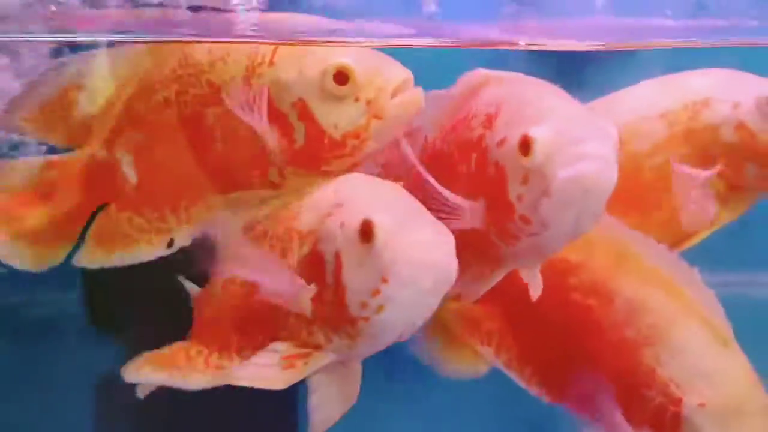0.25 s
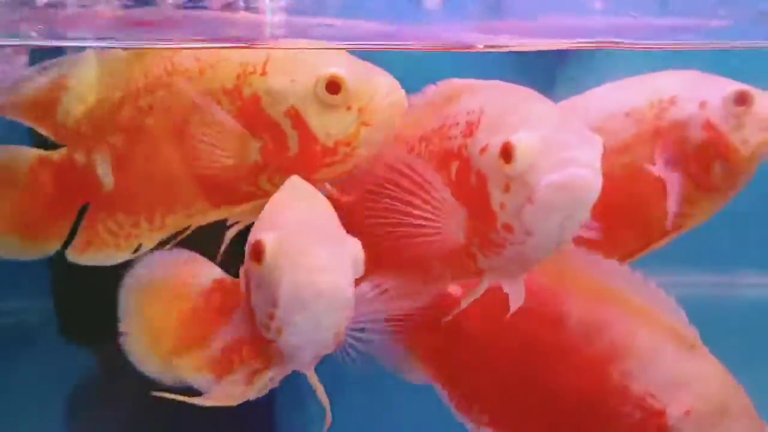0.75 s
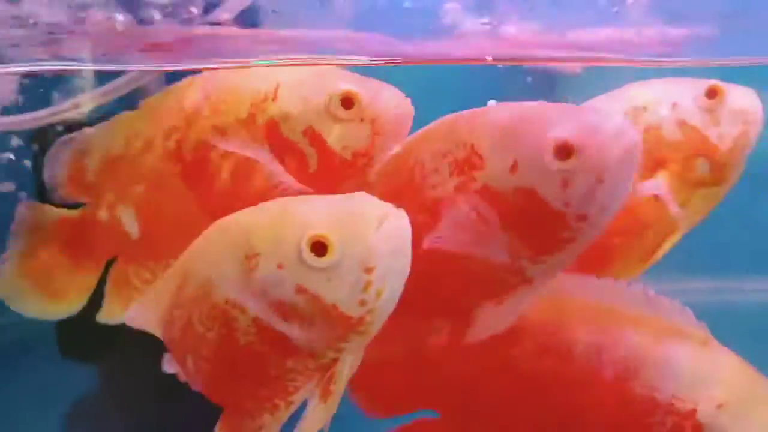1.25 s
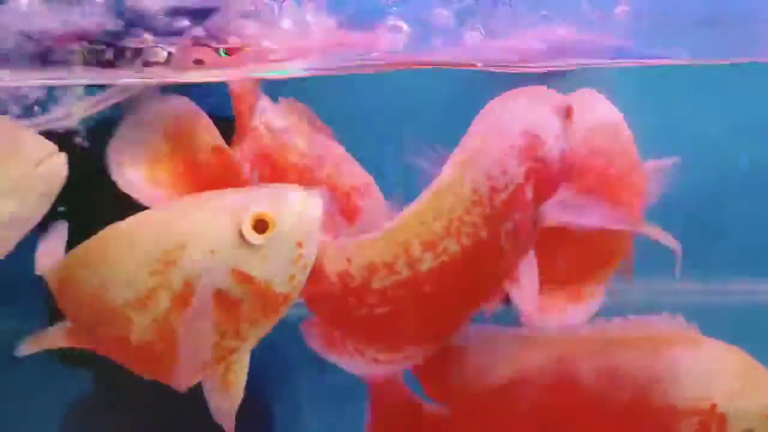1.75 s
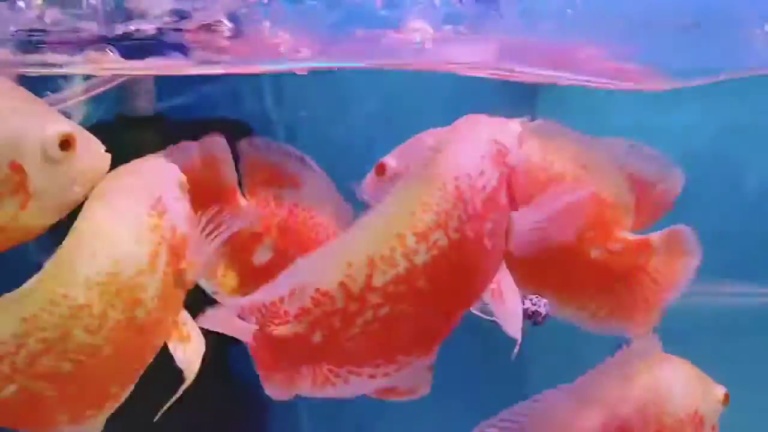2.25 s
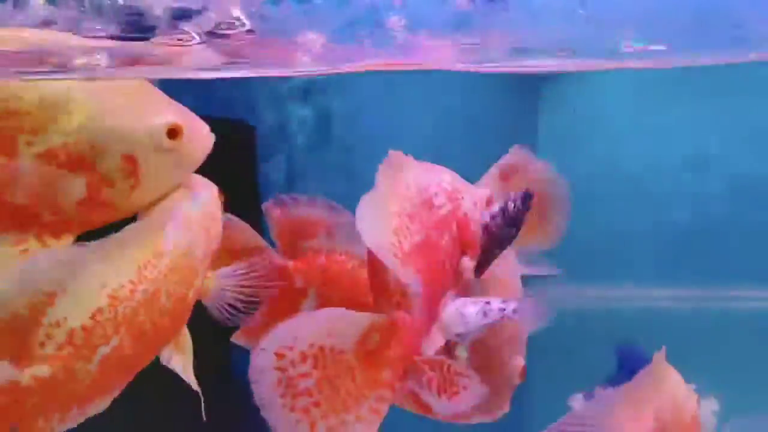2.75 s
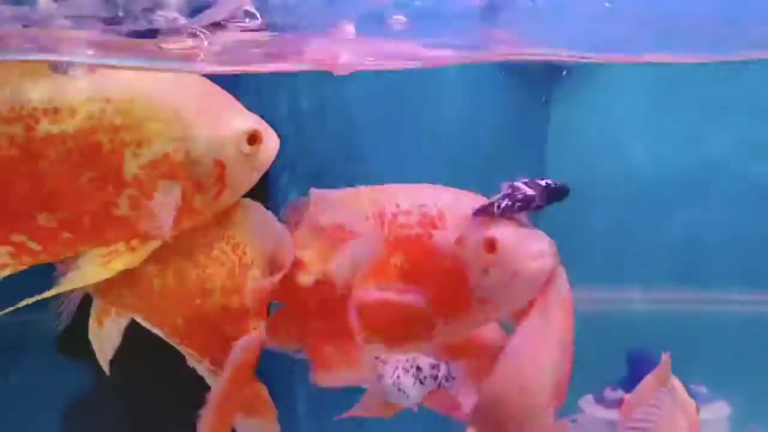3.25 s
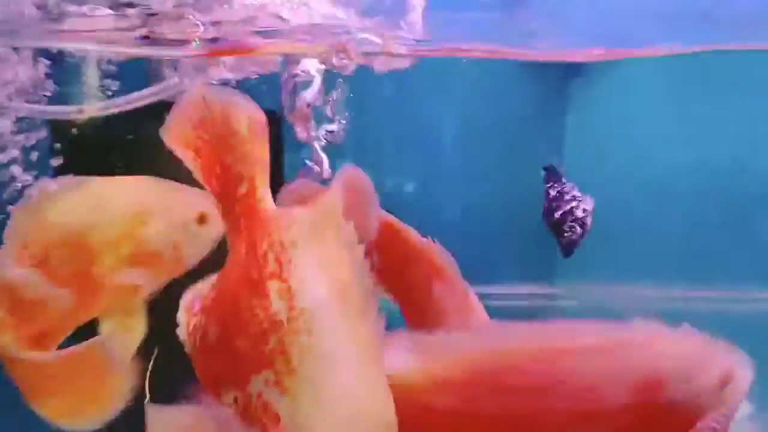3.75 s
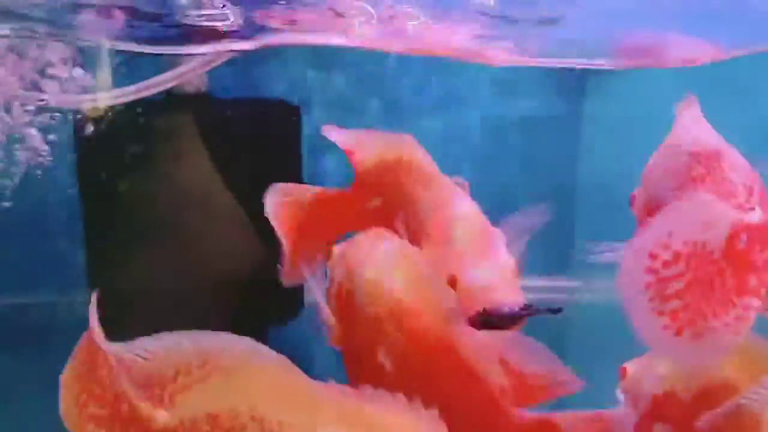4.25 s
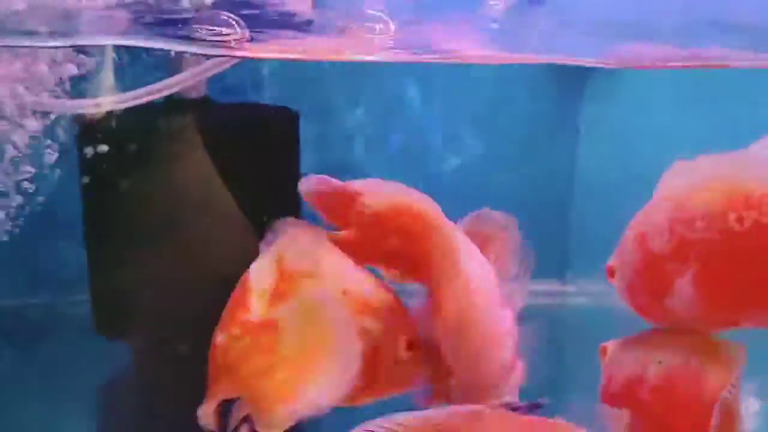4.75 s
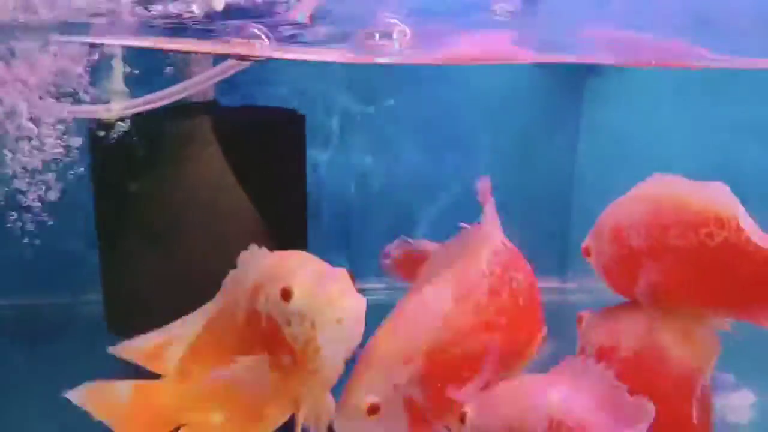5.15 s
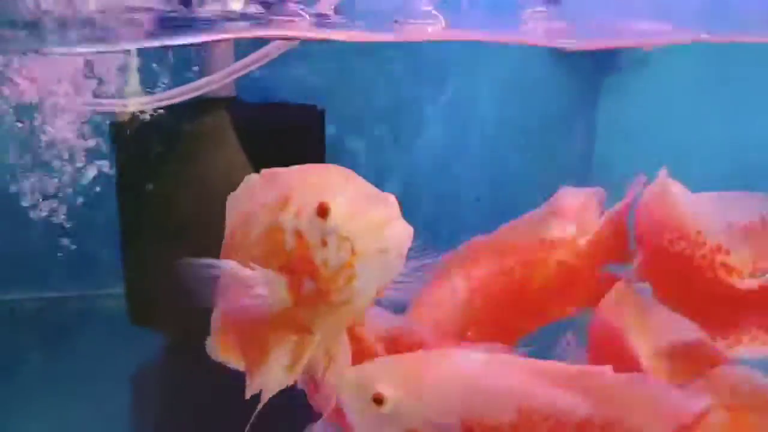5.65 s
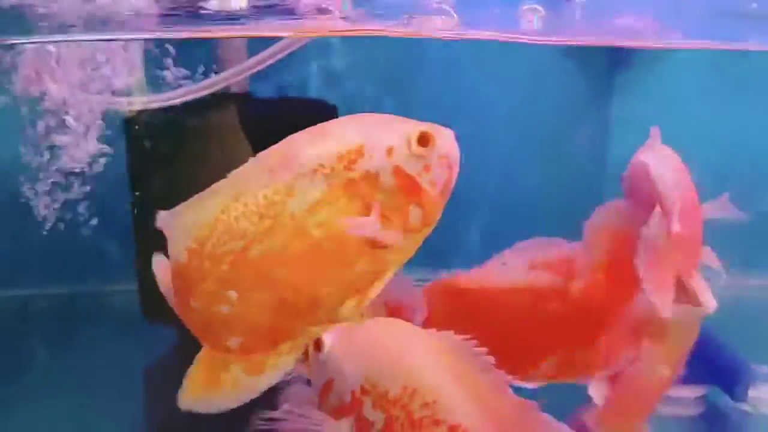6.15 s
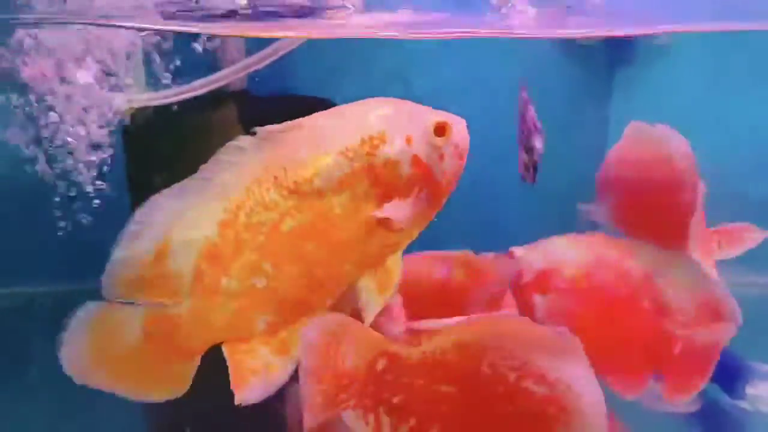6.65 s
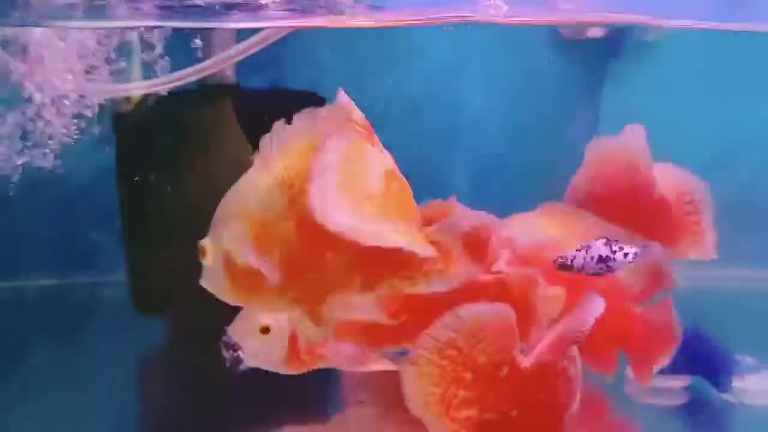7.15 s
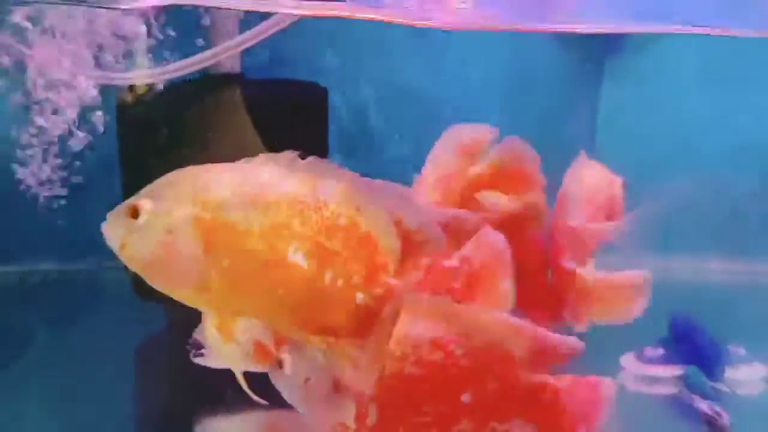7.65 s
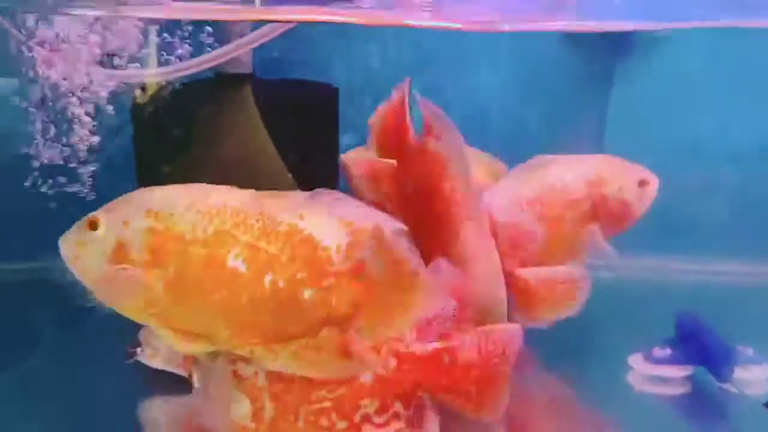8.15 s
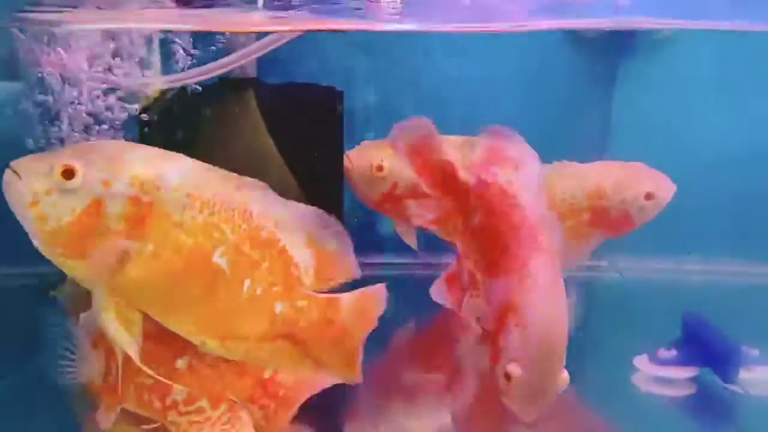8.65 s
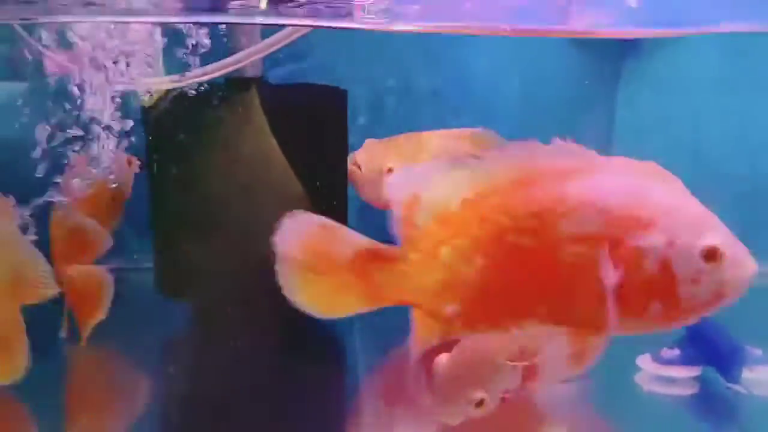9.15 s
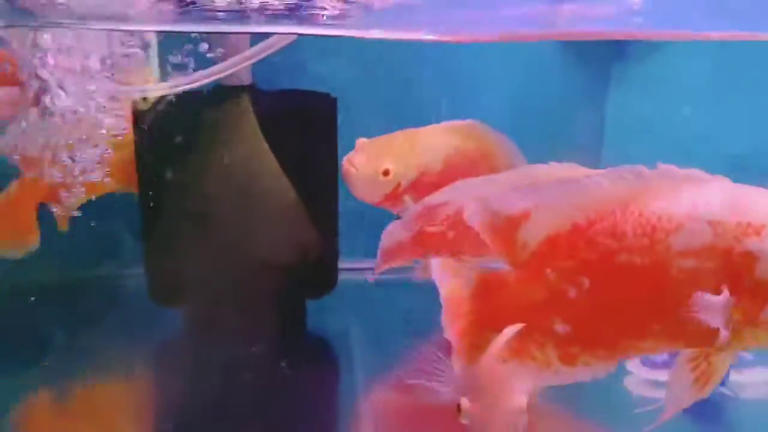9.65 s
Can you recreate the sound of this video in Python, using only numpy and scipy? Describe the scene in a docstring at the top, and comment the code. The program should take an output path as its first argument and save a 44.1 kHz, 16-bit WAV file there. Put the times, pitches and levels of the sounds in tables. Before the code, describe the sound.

In a small room full of aquariums, air stones bubble and fizz without pause over humming air pumps. A thin, clear filter whine holds on one high pitch, stronger on the right. Low gulps and small bright pops stand out. After the middle a muffled rumble like outside traffic swells, with one light knock near seven seconds. Wide stereo pickup amid the tanks.

```python
"""A small room full of aquariums: air pumps hum (mains multiples, narrow-band drones) and a filter whines (sines).
Faint steady high tones lie above; air stones bubble and fizz in many tanks: shaped noise for wash and spray,
decaying rising sines for bubbles. Past the middle a low rumble swells and fades, like traffic going by outside
(shaped noise and engine tones), and something bumps once, lightly (three damped modes)."""
import sys
import numpy as np
from scipy import signal
from scipy.fft import rfft, irfft
from scipy.io import wavfile
from scipy.ndimage import uniform_filter1d

SR = 44100
rng = np.random.default_rng(int(sys.argv[2]) if len(sys.argv) > 2 else 0)


def transcribe(u):
    """Save the signal u as a 16-bit wav file named by the first command-line argument.

    u: samples, shape (n,) or (channels, n), limited to [-1, 1]; the rate is SR.
    q: integer samples, one column per channel.
    """
    v = np.clip(np.atleast_2d(u).T, -1, 1)
    q = np.round(v * 32767).astype(np.int16)
    wavfile.write(sys.argv[1], SR, q)


N = 436149
TIME = np.arange(N) / SR


def gain_of(db):
    """Decibels to amplitude."""
    return 10 ** (np.asarray(db) / 20)


def evened(x):
    """Scales to an rms of one."""
    return x / np.sqrt(np.mean(x ** 2) + 1e-20)


def read(points, hz):
    """Interpolates a spectrum table on a log-frequency axis."""
    f, value = np.transpose(points)
    return np.interp(np.log(hz + 1), np.log(f), value)


def curves(rows):
    """Interpolates each column of a time table, sample by sample."""
    s, *columns = np.transpose(rows)
    return [np.interp(TIME, s, column) for column in columns]


def drift(rate_hz):
    """Low-passed noise of rms one, rolling off above rate_hz."""
    step = 64
    count = N // step
    hz = np.fft.rfftfreq(count, step / SR)
    spectrum = rfft(rng.standard_normal(count)) / (1 + (hz / rate_hz) ** 2)
    slow = evened(irfft(spectrum, count))
    return np.interp(np.arange(N) / step, np.arange(count), slow)


# left-right correlation: (frequency [Hz], correlation [-1..1])
EAR_CORRELATION = [(30, 1), (130, 0.96), (260, 0.96), (380, 0.78), (480, 0.33), (780, 0.0046), (950, 0.44),
                   (1250, -0.14), (1520, -0.19), (2000, 0.016), (7000, -0.078), (11000, 0.11)]


def correlated(a, b, hz):
    """Mixes two independent spectra into an ear pair: alike in the bass, mostly unlike above."""
    same = np.clip(read(EAR_CORRELATION, hz), -1, 1)
    return np.array([a, same * a + np.sqrt(1 - same ** 2) * b])


# grain of the noise, stronger in the treble: (frequency [Hz], factor on patchy_db [1])
GRAIN_BY_HZ = [(250, .3), (700, 0.46), (1100, 0.47), (3000, 0.77), (5500, 1.23), (12000, 1.3)]


def diffuse(spectrum, patchy_db=0, size=2048, patch_size=(12, 16)):
    """Noise from all round the room, rms one, with random level patches (frames by bins)."""
    hop = size // 4
    hz = np.fft.rfftfreq(size, 1 / SR)
    a, b, c, d, patches = rng.standard_normal((5, N // hop + 5, len(hz)))
    patches = uniform_filter1d(patches, size=patch_size[0], axis=0)
    patches = evened(uniform_filter1d(patches, size=patch_size[1], axis=1))
    z = correlated(a + 1j * b, c + 1j * d, hz)
    z *= gain_of(read(spectrum, hz) + patchy_db * read(GRAIN_BY_HZ, hz) * patches)
    _, noise = signal.istft(z.swapaxes(1, 2), nperseg=size, noverlap=size - hop)
    return evened(noise[:, :N])


def room(x, t60_s=.3, wet_db=0):
    """Adds dense decaying echoes between glass tanks and walls, differing by ear above the bass."""
    t = TIME[:SR // 2]
    a, b = rfft(rng.standard_normal((2, len(t))) * gain_of(-60 * t / t60_s))
    tail = irfft(correlated(a, b, np.fft.rfftfreq(len(t), 1 / SR)))
    tail /= np.linalg.norm(tail[0])
    echoes = signal.fftconvolve(x.mean(0)[None], tail, axes=1)[:, :N]
    return x + gain_of(wet_db) * echoes


def ears(left_db, right_db, phase, left_lead_rad):
    """A tone as the two ears meet it: own level each, left phase offset."""
    return gain_of([[left_db], [right_db]]) * np.array([np.sin(phase + left_lead_rad), np.sin(phase)])


def add(mix, s, sound):
    """Mixes a two-channel sound in at time s."""
    part = mix[:, int(s * SR):][:, :sound.shape[1]]
    part += sound[:, :part.shape[1]]


def bubble(hz, cycles, glide=0.068):
    """A bubble rings for a few cycles, rising in pitch from hz as it reaches the surface."""
    life_s = cycles / hz
    t = TIME[:int(2 * life_s * SR)]
    tone = np.sin(2 * np.pi * hz * t * (1 + glide * t / life_s))
    return tone * np.exp(-np.pi * t / life_s) * (1 - np.exp(-2 * hz * t))


def single_bubbles(rows, cycles, right_db, glide):
    """Rings one bubble per table row, right ear offset by right_db."""
    out = np.zeros((2, N))
    for s, hz, db in rows:
        add(out, s, np.outer(gain_of([db, db + right_db]), bubble(hz, cycles, glide)))
    return out


def drone(hz, width_hz):
    """A note of rms one wavering within a narrow band."""
    phase = 2 * np.pi * hz * TIME
    return evened(drift(width_hz) * np.sin(phase) + drift(width_hz) * np.cos(phase))


MAINS_HZ = 50.25
# (mains multiple [1], left level [dB rms], right level [dB rms], left lead [rad])
PUMP_HUM = [(2, -46.5, -45, 0.13), (3, -50, -49.5, -0.1), (4, -47.5, -50.5, 0.4), (6, -44.5, -54, 0.28),
            (7, -50, -62, -0.5), (9, -50, -56, 0.3), (10, -61, -45.5, 2.5), (12, -54, -58, 0.079),
            (13, -59, -67, 0.2)]
# housings and motors: (pitch [Hz], width [Hz], left level [dB rms], right level [dB rms])
HOUSING_DRONES = [(32.2, 2.3, -50, -49), (54.5, 2, -55, -66), (233.2, 12, -47.5, -50.5),
                  (391.4, 7.4, -48, -56), (511.4, 2.8, -50, -51)]


def pumps():
    """Diaphragms driven by the mains hum on its multiples; housings drone in narrow bands."""
    out = np.zeros((2, N))
    for multiple, left_db, right_db, lead_rad in PUMP_HUM:
        wander_rad, waver_db = .12 * drift(2), .6 * drift(2)
        phase = 2 * np.pi * (round(multiple) * MAINS_HZ * TIME + rng.random()) + wander_rad
        out += np.sqrt(2) * ears(left_db, right_db, phase, lead_rad) * gain_of(waver_db)
    for hz, width_hz, left_db, right_db in HOUSING_DRONES:
        out += gain_of([[left_db], [right_db]]) * drone(hz, width_hz)
    return out


WHINE_HZ = 2182.1
# standing wave at each ear, hollow where phases oppose, with a brief dip in both ears at 4.57 s; wavers come on
# top: (time [s], left level [dB peak], right level [dB peak], left lead [rad])
STANDING_WAVE = [(.1, -41, -26.7, 2.7), (.2, -39, -27, 2.5), (.35, -36, -22.8, 2.5), (.8, -35, -25.7, 1.4),
                 (1.35, -38, -23.4, 2.3), (1.6, -35, -22.8, 2.6), (1.87, -38.5, -22.8, 2.6),
                 (2.1, -35, -23, 2.4), (2.8, -35.3, -23.7, 2.3), (3.2, -38, -25.3, 1.8),
                 (3.85, -55, -26.3, 2.3), (4.35, -37, -26.7, 2.7), (4.545, -36, -26.3, 2.8),
                 (4.57, -43, -33, 2.7), (4.595, -35.5, -25.3, 2.8), (5.05, -36, -25.2, 2.7),
                 (5.27, -32.5, -24.7, 2.8), (5.38, -32, -26.6, 2.9), (5.55, -35.5, -27, 2.9),
                 (5.64, -32, -29.8, 3.1), (5.78, -32.5, -26.3, 3), (5.92, -32.7, -27.7, 3.1),
                 (6.03, -35.5, -27.3, 2.9), (6.2, -31.7, -26.4, 3), (6.42, -35, -25.2, 3),
                 (6.55, -31, -25.7, 3.1), (6.68, -36, -25.3, 3.1), (6.82, -30.7, -26, 3.1),
                 (7.05, -32.7, -25.7, 3.1), (7.55, -34, -25, 3.3), (7.73, -40, -24.7, 3.3),
                 (7.9, -35.5, -25.5, 3.6), (8.1, -38.5, -24.6, 3.1), (8.4, -34, -25.3, 3.4),
                 (8.6, -37, -25, 3.3), (8.75, -36.5, -26.5, 3.3), (8.92, -47, -24.8, 3.9),
                 (9.04, -35.5, -24.6, 5.9), (9.89, -38.5, -24.5, 5.7)]
# (whine multiple [1], left level [dB peak], right level [dB peak], left lead [rad], trend [dB/s]), before fading
WHINE_OVERTONES = [(2, -44.5, -50.5, -1.5, -.3), (3, -53, -53, .9, -1.3)]


def whine(right_waver_db=0.46, left_waver_db=2.4):
    """The filter's clean note with weak overtones; each ear sits elsewhere in its standing wave."""
    left_db, right_db, whine_lead_rad = curves(STANDING_WAVE)
    phase = 2 * np.pi * WHINE_HZ * TIME + .3 * drift(1)
    left_gain = gain_of(left_db + left_waver_db * drift(4))
    right_gain = gain_of(right_db + right_waver_db * drift(12.0))
    left = left_gain * np.sin(phase + whine_lead_rad + 0.088 * drift(5.4))
    out = np.array([left, right_gain * np.sin(phase)])
    for multiple, left_db, right_db, lead_rad, db_per_s in WHINE_OVERTONES:
        fading = evened(gain_of(2.5 * drift(3))) * gain_of(db_per_s * TIME)
        out += fading * ears(left_db, right_db, round(multiple) * phase, lead_rad + .5 * drift(0.74))
    return out


# (frequency [Hz], left level [dB peak], right level [dB peak], left lead before drift [rad])
FAINT_TONES = [(9682.5, -65, -62.5, 2.5), (11863.8, -73.5, -76, -.8), (14046, -75, -75, .6)]


def high_tones():
    """Faint steady sines high up, the left phase drifting against the right."""
    out = np.zeros((2, N))
    for hz, left_db, right_db, lead_rad in FAINT_TONES:
        out += ears(left_db, right_db, 2 * np.pi * hz * TIME, lead_rad + drift(.5))
    return out


GRAIN_SIZE = (5, 3)  # frames, bins
# churning water: (frequency [Hz], relative density [dB per Hz])
WASH_SPECTRUM = [(30, -14), (60, -15), (75, -21), (90, -5.5), (122, -17.5), (195, -1.5), (290, -3),
                 (390, -2.5), (520, -5), (620, -7), (760, -9), (950, -5), (1100, -6), (1520, -9),
                 (2050, -7), (2650, -9), (2950, -10.5), (3600, -9.5), (5100, -16), (5750, -17), (6400, -24),
                 (8000, -36), (14500, -38.5)]


def wash(level_db=-29):
    """Countless far bubbles merge into a wash of noise."""
    return gain_of(level_db) * diffuse(WASH_SPECTRUM, patchy_db=3.5, size=2048, patch_size=GRAIN_SIZE)


# (lowest [Hz], highest [Hz], rate [1/s], ring [cycles], size spread [dB],
#  largest over smallest [dB], level before flow [dB rms])
BUBBLE_SWARMS = [(200.8, 535, 90, 13, 4.5, 1.5, -42), (848, 2370, 220, 16.5, 5.5, 8, -44),
                 (2630, 6200, 380, 24, 3.5, 8.5, -43.5)]


def swarm(low_hz, high_hz, per_s, cycles, spread_db, largest_db, level_db, pitches=100):
    """Bubbles at random times, sizes and sides, from tanks on both sides."""
    out = np.zeros((2, N))
    per_pitch = int(per_s * N / SR / pitches)
    for hz in np.geomspace(low_hz, high_hz, pitches):
        ring = bubble(hz, cycles)
        for when, size, side in rng.random((per_pitch, 3)):
            size_db = min(-spread_db * np.log(1 - size), largest_db)
            add(out, when * N / SR, np.outer([1 + side, 2 - side], ring) * gain_of(size_db))
    return gain_of(level_db) * evened(room(out, t60_s=0.15, wet_db=1.5))


def swarms():
    """Nearer bubbles ring singly, in three ranges of pitch."""
    return sum(swarm(*row) for row in BUBBLE_SWARMS)


# clusters of bursting bubbles: (frequency [Hz], relative density [dB per Hz])
SPRAY_SPECTRUM = [(2000, -7), (4500, -13.5), (6800, 4.5), (8000, -7), (9000, -4.5), (13500, -13),
                  (15000, -36)]
# larger clusters burst: (time [s], level change [dB])
SPRAY_SPURTS = [(.18, 1), (2.07, 3), (2.165, -1), (2.254, 4), (2.855, 4), (3.38, 1), (3.58, 4), (4.045, 1),
                (4.275, 4), (5.02, 4), (5.28, 1), (6.44, 3), (6.72, 2), (7.124, 2), (7.414, 5), (9.56, 1)]


def spray(level_db=-48, left_db=1.5, spurt_s=.025):
    """Hissing noise from bursting bubbles, sputtering at random and in short spurts."""
    sputter_db = .7 * drift(20)
    spurts_db = sum(db * np.exp(-((TIME - s) / spurt_s) ** 2) for s, db in SPRAY_SPURTS)
    hiss = diffuse(SPRAY_SPECTRUM, patchy_db=3.5, size=1024, patch_size=GRAIN_SIZE)
    return gain_of([[level_db + left_db], [level_db]]) * evened(hiss * gain_of(sputter_db + spurts_db))


# air flow through the water: (time [s], level [dB])
AIR_FLOW = [(0, -0.2), (.8, 0.25), (1.3, -.3), (2.1, 0), (2.5, -0.4), (3.0, -0.5), (3.45, .5), (4.2, -0.3),
            (5.0, 0.1), (5.65, -1), (5.95, .5), (6.2, 0), (6.7, -0.1), (7.13, 1.8), (7.6, 0), (8.0, 0),
            (8.45, -0.5), (9.0, -.2), (9.89, 0)]


def water():
    """Wash, spray and swarms rise and fall together with the air flow."""
    flow_db, = curves(AIR_FLOW)
    return (wash() + spray() + swarms()) * gain_of(flow_db)


def swells(rows, steady_db, falloff=1.3):
    """Gains that rise above a steady level and sink again, summed in power."""
    power = gain_of(steady_db)[:, None] ** 2
    for s, half_s, *levels_db in rows:
        shape = np.hypot(1, (TIME - s) / half_s) ** -falloff
        power = power + np.outer(gain_of(levels_db), shape) ** 2
    return np.sqrt(power)


# steady town behind the swells
FAR_ROAR_DB, FAR_BOOM_DB, FAR_RUMBLE_DB = -75, -54, -51.5
# tyres on the road: (frequency [Hz], relative density [dB per Hz])
ROAR_SPECTRUM = [(40, -12), (120, -9), (250, 4), (310, 3.5), (420, -5), (580, 3), (770, -1.5), (900, 5),
                 (1080, 5), (1400, -3), (1800, 1), (2200, -5.5), (4000, -19), (8000, -34), (15000, -42)]
# boom through the walls: (frequency [Hz], relative density [dB per Hz])
BOOM_SPECTRUM = [(25, -23), (85, -10.5), (118, -10), (160, -7.5), (220, -3), (305, -2.5), (355, -16),
                 (700, -16), (2000, -58)]
# (frequency [Hz], relative level [dB])
ENGINE_NOTES = [(25.5, -15), (33.6, 0.5), (48.7, 1.5), (84, -13), (97.4, -8.5)]
# (top time [s], half length [s], road roar [dB], wall boom [dB])
TRAFFIC_SURGES = [(.75, 0.079, -44, -38), (2.7, 0.13, -53, -40), (5.55, 0.17, -36, -36),
                  (6.27, 0.091, -37, -44), (6.55, 0.2, -40, -38), (7.03, 0.62, -34.5, -46),
                  (7.75, 0.43, -39.5, -36.5), (8.55, 0.57, -40, -41), (9.35, 0.34, -39, -36)]
# engines pulling: (top time [s], half length [s], level [dB])
ENGINE_THROBS = [(.24, 0.11, -42), (2.7, 0.08, -39), (5.63, .15, -48), (6.02, .12, -39), (6.55, 0.25, -36),
                 (7.0, 0.13, -34), (7.52, 0.12, -34), (7.78, 0.11, -39), (8.15, 0.11, -42),
                 (8.42, .12, -35), (8.8, 0.058, -35), (9.1, 0.048, -35), (9.32, 0.091, -39),
                 (9.7, .15, -55)]


def traffic(wander_rad=1.0):
    """Road roar, boom and throbbing engine notes swell and fade beyond the walls."""
    roar, boom = swells(TRAFFIC_SURGES, [FAR_ROAR_DB, FAR_BOOM_DB])
    rumble, = swells(ENGINE_THROBS, [FAR_RUMBLE_DB], falloff=2.2)
    engines = np.zeros(N)
    for hz, db in ENGINE_NOTES:
        engines += gain_of(db) * np.sin(2 * np.pi * hz * TIME + wander_rad * drift(4.9))
    noise = roar * diffuse(ROAR_SPECTRUM, size=2048) + boom * diffuse(BOOM_SPECTRUM, size=4096)
    return noise + rumble * evened(engines)


# (time [s], starting pitch [Hz], level before ring envelope and room [dB])
BIG_BUBBLES = [(.74, 290, -29), (1.0, 215, -29), (1.09, 315, -27), (2.639, 252, -33), (4.0, 315, -31),
               (4.41, 262, -33), (4.59, 235, -28), (5.33, 390, -25), (6.326, 390, -30), (6.365, 317, -27),
               (6.455, 300, -23.5), (6.558, 300, -28), (6.696, 212, -24), (7.033, 238, -33),
               (7.056, 300, -31), (7.283, 199, -26), (7.527, 238, -28), (7.73, 276, -23.5),
               (7.835, 294, -30), (8.357, 238, -24.5), (9.083, 215, -26), (9.6, 238, -26)]


def burbles():
    """Big pockets of air gulp at the surface: low bubbles, equal in both ears."""
    return room(single_bubbles(BIG_BUBBLES, cycles=22, right_db=0, glide=.02), t60_s=.16, wet_db=-9)


# (top time [s], half length to 1/e [s], mains multiple [1], top level [dB rms])
HUM_RISES = [(.99, .14, 3, -44), (1.24, 0.11, 3, -43), (3.36, .12, 2, -44), (7.08, .2, 3, -45),
             (7.67, 0.12, 2, -40), (7.93, 0.1, 3, -41), (9.29, 0.073, 2, -44), (9.48, .15, 3, -40.5)]


def hum_swells():
    """Low tones on the hum's second and third multiples well up now and then, alike in both ears."""
    out = np.zeros(N)
    for s, half_s, multiple, db in HUM_RISES:
        phase = 2 * np.pi * (round(multiple) * MAINS_HZ * TIME + rng.random()) + .5 * drift(2)
        swell = np.exp(-((TIME - s) / half_s) ** 2)
        out += np.sqrt(2) * gain_of(db) * swell * np.sin(phase)
    return out


# (time [s], starting pitch [Hz], left level before ring envelope and room [dB])
NEAR_POPS = [(2.160, 7000, -32), (2.832, 5360, -33), (2.967, 3260, -21), (3.102, 1180, -25),
             (4.040, 5300, -23), (4.955, 5400, -28), (5.346, 3700, -26), (6.533, 4250, -23),
             (6.716, 5900, -28), (7.410, 6560, -25), (7.455, 6750, -30), (8.116, 3480, -24),
             (8.911, 3480, -24)]


def pops():
    """A few nearer bubbles pop just clear of the wash."""
    return room(single_bubbles(NEAR_POPS, cycles=25, right_db=-3, glide=0.068), t60_s=0.18, wet_db=-8)


# light bump on a tank: (time [s], level on top of the modes [dB])
TANK_BUMP = (7.384, -30.5)
# (frequency [Hz], relative level [dB], t60 [s])
TANK_MODES = [(884, 13, 0.055), (1060, -4, .03), (1500, -10, .03)]


def bump(rise_s=0.0018, right_db=-6):
    """A soft knock: damped modes ring briefly, to the left."""
    start_s, level_db = TANK_BUMP
    t = np.maximum(TIME - start_s, 0)
    ring = np.zeros(N)
    for hz, db, t60_s in TANK_MODES:
        ring += gain_of(db) * np.exp(-np.log(1000) * t / t60_s) * np.sin(2 * np.pi * hz * t)
    knock = gain_of([[level_db], [level_db + right_db]]) * ring * (1 - np.exp(-t / rise_s))
    return room(knock, t60_s=.25, wet_db=-13)


def scene():
    """Everything that sounds in the fish room."""
    steady = pumps() + whine() + high_tones() + water() + traffic()
    return steady + burbles() + hum_swells() + pops() + bump()


def record(dry, edge_hz=15000):
    """Band limit: linear-phase low-pass at edge_hz."""
    low_pass = signal.firwin(511, edge_hz, window=("kaiser", 9), fs=SR)
    return signal.oaconvolve(dry, low_pass[None], "same")


dry = scene()
out = record(dry)
transcribe(out)
```